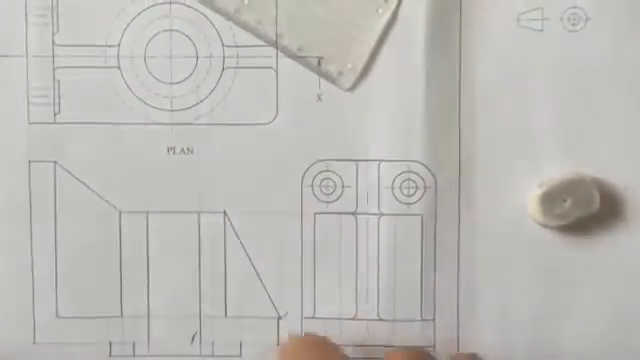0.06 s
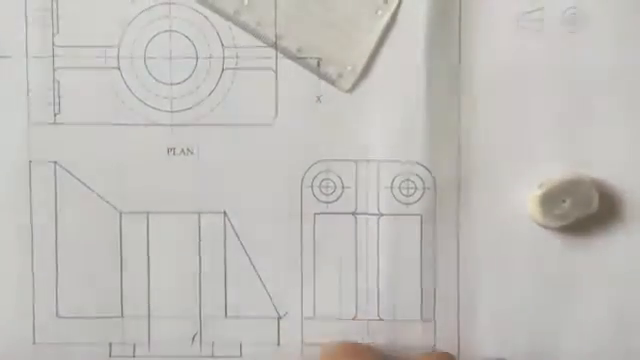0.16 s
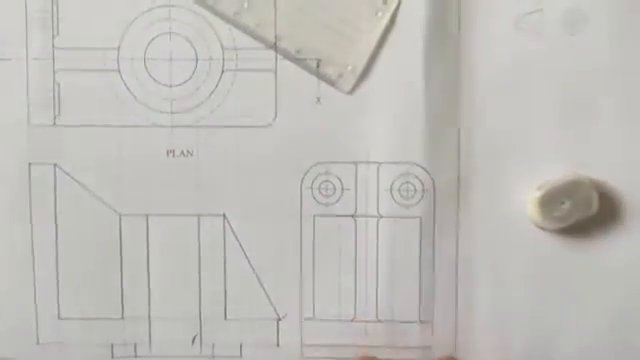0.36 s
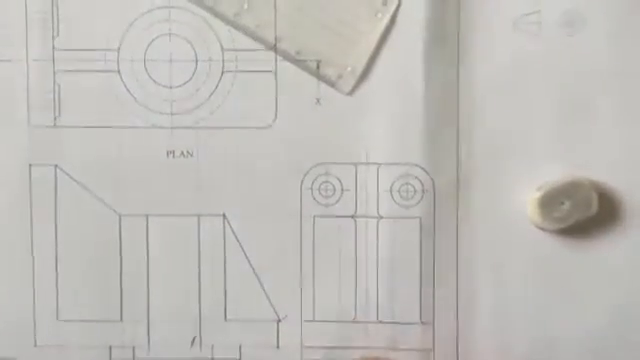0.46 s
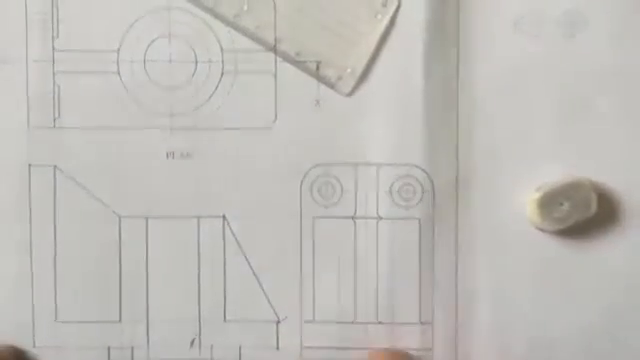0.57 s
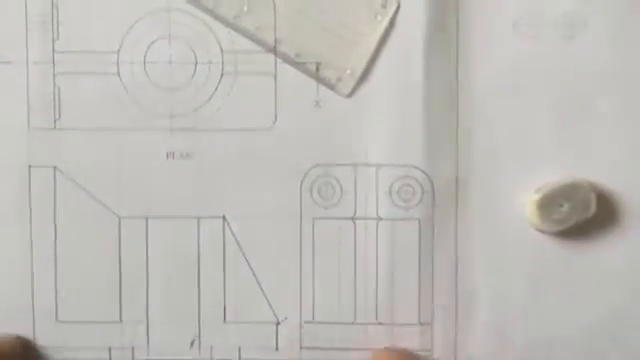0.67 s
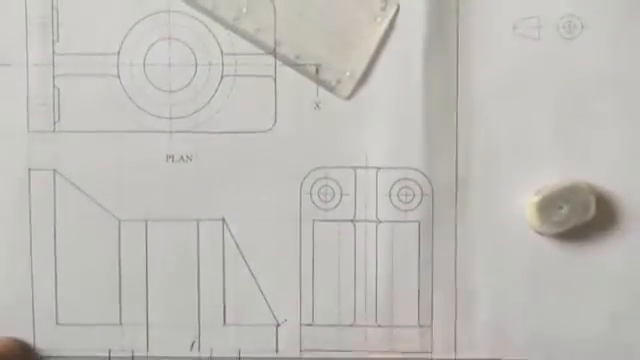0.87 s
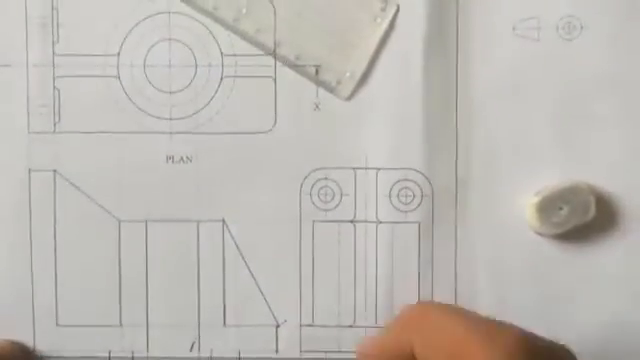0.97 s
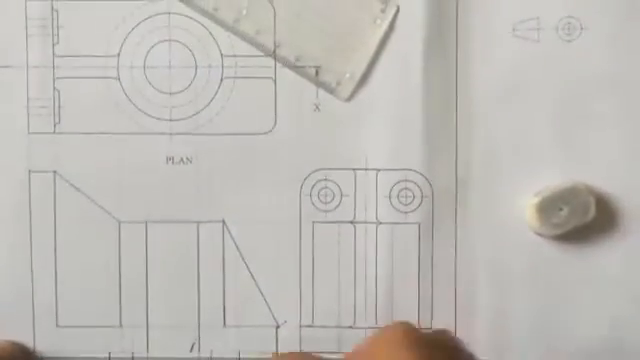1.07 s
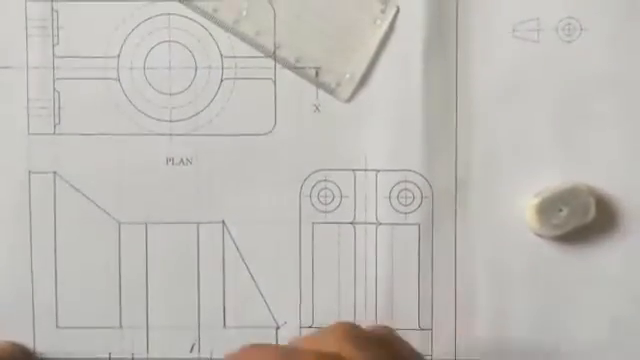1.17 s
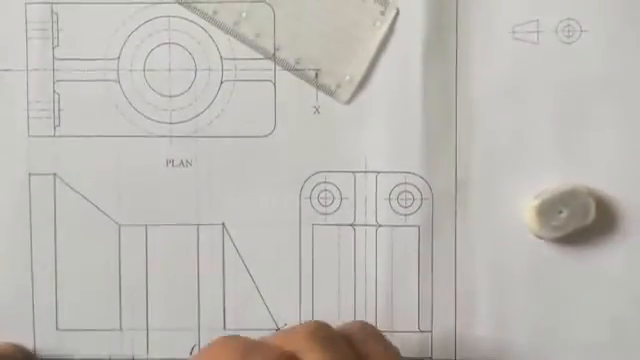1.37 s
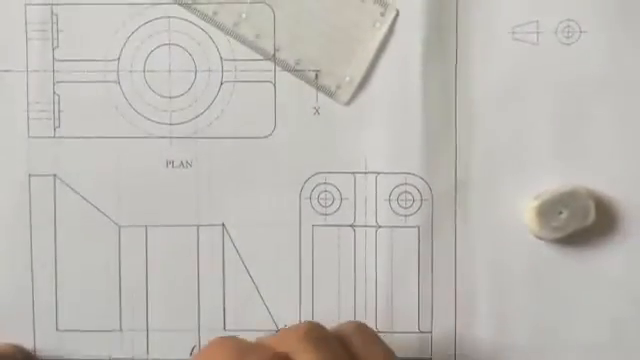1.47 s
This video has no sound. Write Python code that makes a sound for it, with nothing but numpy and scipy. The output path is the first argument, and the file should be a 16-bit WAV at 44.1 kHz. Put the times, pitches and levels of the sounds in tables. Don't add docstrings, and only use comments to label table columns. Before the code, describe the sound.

A plastic ruler is set down on paper on a wooden desk, heard close. Faint shuffling and light ticks lead to a loud clattering slap at 0.24 s, chattering until 0.35. More knocks, clicks and a short scratch come at 0.47-0.55, a hard double knock near 0.64, sharp snaps around 0.72-0.8, and a softer tap at 0.96. A tiny tick at 1.18 and a barely audible touch near 1.4 follow in small-room quiet.

```python
import sys
import numpy as np
from scipy import signal
from scipy.fft import rfft, irfft
from scipy.io import wavfile

SR = 44100
rng = np.random.default_rng(int(sys.argv[2]) if len(sys.argv) > 2 else 0)


def gain_from_decibels(decibels):
    exponent = np.asarray(decibels, float) / 20
    return 10 ** exponent


def persist_wave(psi):
    counts = np.round(np.clip(psi, -1, 1) * 32767).astype(np.int16)
    wavfile.write(sys.argv[1], SR, np.atleast_2d(counts).T)


N = 66150

# freq_hz, density_db
ROOM_TONE = [(30, 4.5), (60, -11.5), (160, 3), (400, -11.5), (1000, -16), (4800, -21.5), (12000, -27),
             (16000, -30)]
# middle_s, half_length_s, level_db
WHISPERS = [
    (.01, 0.099, -53.5),
    (0.098, 0.025, -56.5),
    (0.141, 0.037, -56.5),
    (0.625, 0.016, -47),
    (0.692, 0.061, -49),
    (0.757, 0.0064, -54),
    (1.056, 0.041, -57.5),
    (1.274, 0.049, -63.5),
    (1.418, 0.014, -66.5),
]
# freq_hz, level_db
WHISPER_COLOUR = [(1000, 7.5), (4000, 1), (9000, -3), (15000, -10)]
# start_s, peak_db, centre_hz, chatter_ms
KNOCKS = [(.003, -39, 298, 7.4), (0.059, -28, 474, 6.1), (.080, -34, 241, 6.7), (.237, -8.5, 373, 6.95),
          (.249, -14, 500, 4.6), (.262, -20.5, 400, 9.1), (0.276, -20, 305, 6), (.287, -18.5, 258, 6.2),
          (.303, -11.5, 465, 5.4), (.315, -19, 320, 5.8), (0.322, -24.5, 320, 5.3), (.337, -24.5, 260, 3.2),
          (.365, -37, 200, 6), (0.419, -37, 300, 3), (0.471, -16, 524, 7.3), (.480, -17.5, 300, 3.9),
          (.492, -19, 500, 1.2), (0.512, -29, 920, 3.3), (0.558, -29, 374, 8.9), (.637, -13.5, 735, 14.4),
          (.647, -14, 600, 7.9), (0.666, -14, 500, 4.2), (0.68, -21, 320, 7.4), (0.69, -23, 310, 2.6),
          (.732, -23, 306, 2.5), (0.773, -21, 357, 8.7), (.808, -30, 237, 5.7), (.9645, -22.5, 650, 5.7),
          (0.995, -26.5, 480, 5.45), (1.409, -54, 250, 8.3)]
# freq_hz, level_db, t60_s
TOP_MODES = [(200, -0.5, 0.084), (240.5, -3, 0.1), (320, -1.5, 0.055), (367.8, -4, 0.063),
             (419.2, -6.5, 0.11), (500, 1, 0.047), (565.4, -4, 0.095), (790, -22, 0.072),
             (842.3, -0.5, 0.068), (1032, -0.5, 0.013), (1171, 0, 0.044), (1260, 1, .05), (1547, -4, 0.032),
             (1823, 5, 0.033)]
# start_s, peak_db
THUMPS = [(.004, -36.5), (.065, -27.5), (0.109, -38), (0.241, -21.5), (0.291, -23.5), (0.323, -14.5),
          (0.36, -24.5), (0.462, -24.5), (0.507, -15.5), (0.546, -23), (0.596, -42), (.645, -56),
          (0.684, -21), (0.735, -21.5), (0.771, -36), (.84, -46), (0.898, -41), (0.975, -25.5), (1, -30),
          (1.403, -50), (1.471, -54.5)]
# freq_hz, level_db, t60_s
FRAME_MODES = [(52, -23.5, 0.077), (71.1, -2, 0.28), (88.6, 3, 0.087), (96.6, 0, 0.21), (135, -35, 0.32),
               (161.9, 4.5, 0.19)]
# freq_hz, t60_s
ROOM_T60 = [(60, 0.336), (200, 0.34), (1500, 0.62), (5000, 0.58), (12000, 0.66)]
# start_s, peak_db, ring_hz, crack_above_5khz_db
TICKS = [(0.058, -32, 940, -68), (.084, -44, 1600, -50), (.095, -34.5, 1955, -45.5),
         (0.165, -41, 1410, -63), (0.2045, -37, 2040, -50), (0.2395, -10.5, 3534, -35),
         (0.246, -16.5, 3230, -26), (0.274, -12.5, 3180, -28), (0.3, -22, 3250, -42),
         (0.308, -18.5, 3200, -50), (0.3255, -25.5, 3030, -38.5), (.351, -27, 2530, -38.5),
         (0.4358, -26, 3040, -71), (.460, -47, 4700, -44), (0.4742, -34.5, 2520, -54),
         (.4875, -22, 3320, -38), (0.498, -22.5, 3000, -30.5), (.518, -13, 1400, -44),
         (.547, -27, 2340, -37), (0.6354, -18, 1480, -19), (.648, -19, 1260, -37), (0.7205, -17, 1870, -44),
         (.762, -27.5, 2460, -29.5), (.769, -22.5, 1270, -45), (.788, -12, 3267, -20.5),
         (.794, -16.5, 1124, -55), (0.826, -29, 2550, -31), (0.9637, -19, 3503, -37.5),
         (0.996, -29.5, 3340, -58), (1.182, -46, 2200, -58)]
# start_s, peak_db, ring_hz, crack_above_5khz_db
MORE_TICKS = [(.065, -30.5, 1300, -71), (.243, -16, 3310, -47), (.250, -33, 2560, -36),
              (.257, -32.5, 3100, -50), (.264, -29, 2560, -53), (.2805, -28, 2580, -44),
              (.288, -31, 3000, -50), (.305, -30, 1310, -42), (.316, -36, 2470, -52),
              (.4925, -18.5, 1780, -48), (.4955, -30, 2480, -32), (.5025, -21, 3400, -30),
              (.506, -26, 1660, -28), (.5095, -17, 1580, -42), (.5135, -28, 1580, -51),
              (.522, -22, 3150, -52), (.5255, -30.5, 2940, -55), (.553, -32, 2840, -53),
              (.636, -23.5, 4390, -31), (.6385, -26.5, 986, -44), (.644, -24, 1710, -48),
              (.724, -19, 1830, -56), (.9668, -25.5, 3300, -48), (.7915, -24.5, 3340, -34),
              (.765, -28, 4480, -34), (.2765, -16, 3510, -39), (.999, -32, 2450, -62)]
# start_s, peak_db, pitch_hz, swell_ms, pitch_rise_per_swell
FLEXES = [(.059, -29.5, 321, 4.5, 0.013), (.2835, -15, 291.6, 5.2, .01), (.311, -15.5, 330, 5.6, 0.012),
          (.322, -15.5, 303, 2.4, -0.016), (.4735, -20, 287, 5, 0.0066), (.666, -14, 268, 4.44, 0.031),
          (0.679, -28, 320, 5, -0.0095), (.692, -21.5, 306, 2.5, 0.15), (.966, -24.5, 225.3, 9.5, 0.32),
          (.733, -31, 300, 3.7, .01), (.813, -26, 268, 4.6, -0.016)]
# start_s, length_s, level_db, tilt_db_per_oct
DRAGS = [
    (0.487, 0.045, -30, 2),
    (0.61, 0.014, -45, 6),
    (0.73, 0.089, -40.5, -5),
    (0.455, 0.061, -39.5, -2.8),
    (0.273, 0.12, -44.5, -4),
    (1.395, 0.036, -66, 0),
    (0.2244, 0.02, -44, -4.5),
    (0.143, 0.091, -57, -5.5),
]
# start_s, level_db, fade_s, tilt_db_per_oct
RATTLES = [(0.2372, -21, 0.017, -0.1), (0.273, -22.5, 0.0099, -2), (0.303, -28.5, 0.019, -1.4),
           (0.632, -24, 0.036, -1), (0.759, -23.5, 0.0076, 4), (0.788, -23, 0.017, 0.9),
           (0.824, -35, 0.011, 2.5), (0.963, -29.5, 0.011, -0.5), (0.995, -50.5, 0.013, 5.5),
           (0.473, -31.5, .012, -1), (0.521, -30.5, 0.013, 0), (0.546, -33, 0.018, 0.5)]
# freq_hz, level_db
SCRATCH_COLOUR = [(400, -7.5), (800, -2), (1400, -1.5), (2300, -5.5), (3500, -10), (5000, -16.5),
                  (8000, -21.5), (15000, -44)]
# start_s, peak_db, centre_hz
SNAPS = [(.2398, -18, 4260), (.275, -22, 4400), (.3012, -31, 4500), (.326, -29.5, 5000), (.3515, -35, 5000),
         (.4605, -33, 5800), (.4755, -33, 4000), (.488, -28.5, 4800), (.4965, -24.5, 8000),
         (.5045, -32.5, 7000), (.5085, -43, 7000), (.5478, -27, 3470), (.7625, -24, 6000),
         (.7885, -14.5, 6000), (.9643, -29, 4080), (1.1831, -36.5, 5070)]

ROOM_TONE_DB, ROOM_DB, TICK_ROOM_DB = -61, -7.5, -13
DESK_ECHO_S, DESK_ECHO_DB = 0.0031, -14.5
PLACE_DB, DETUNE = 2.5, 0.026
KNOCK_DB_PER_OCT, THUMP_MS, THUMP_DB = 9.5, 6.22, -3.0
TICK_T60_S, TICK_SPREAD, TICK_CHATTER_MS = 0.012, 0.113, 2.54
TICK_TOP = 2.1
CRACK_S, CRACK_DB, CRACK_LOW_HZ, CRACK_TOP_HZ = 0.00096, 3, 5000, 8870
FLEX_OVERTONE_DB = -10
SLIPS_PER_S, RATTLE_ATTACK_S = 9800, 0.0044
SNAP_S, SNAP_OCTAVES = 0.00029, 0.82
MIC_LOW_HZ, RECORDER_TOP_HZ = 53, 14700


def add(out, start_s, x):
    i = max(int(start_s * SR), 0)
    out[i:i + len(x)] += x[:len(out) - i]


def add_with_echo(out, start_s, x):
    add(out, start_s, x)
    add(out, start_s + DESK_ECHO_S, gain_from_decibels(DESK_ECHO_DB) * x)


def colour(x, points):
    hz, db = np.array(points, float).T
    f = np.maximum(np.arange(len(x) // 2 + 1) * SR / len(x), 1)
    gain = gain_from_decibels(np.interp(np.log(f), np.log(hz), db))
    y = irfft(rfft(x) * gain, len(x))
    return y / np.std(y)


def chatter(ms, noise):
    t = np.arange(len(noise)) / SR * 1000 / max(ms, 0.2)
    force = rfft(noise * t * np.exp(-3 * t))
    size = np.abs(force)
    even = irfft(force / (size + 0.38 * size.mean()))
    return even * np.minimum(4 * t, 1) * np.exp(-t)


def ring(modes, push, chance, length_s=0.3):
    t = np.arange(int(length_s * SR))[:, None] / SR
    hz, db, t60_s = np.array(modes, float).T
    gain = gain_from_decibels(db + PLACE_DB * chance[:len(hz)]) * np.sign(chance[-len(hz):])
    hz = hz * (1 + DETUNE * chance[-len(hz):])
    decay = np.exp(-np.log(1000) * t / t60_s)
    impulse = (gain * decay * np.sin(2 * np.pi * hz * t)).sum(1)
    y = signal.fftconvolve(impulse, push)
    return y / np.abs(y).max()


def room_tone():
    return gain_from_decibels(ROOM_TONE_DB) * colour(rng.standard_normal(N), ROOM_TONE)


def whispers():
    t = np.arange(N) / SR
    swell = np.zeros(N)
    for middle_s, half_s, db in WHISPERS:
        swell += gain_from_decibels(db) * np.cos(np.pi / 2 * np.clip((t - middle_s) / half_s, -1, 1))
    grain = rng.standard_normal(N) * gain_from_decibels(1.66 * rng.exponential(1, N))
    return swell * colour(grain, WHISPER_COLOUR)


def knocks():
    out = np.zeros(N)
    for start_s, db, centre_hz, ms in KNOCKS:
        near = [(hz, level_db - KNOCK_DB_PER_OCT * abs(np.log2(hz / centre_hz)), t60_s)
                for hz, level_db, t60_s in TOP_MODES]
        noise = rng.standard_normal(2048)
        add(out, start_s, gain_from_decibels(db) * ring(near, chatter(ms, noise), noise[:30]))
    return out


def thumps():
    out = np.zeros(N)
    push = np.hanning(int(THUMP_MS * SR / 1000))
    for start_s, db in THUMPS:
        add(out, start_s, gain_from_decibels(db + THUMP_DB) * ring(FRAME_MODES, push, rng.standard_normal(30)))
    return out


def room(x):
    t = np.arange(SR // 2) / SR
    noise = rfft(rng.standard_normal(len(t)))
    f = np.log(np.arange(len(noise)) * 2.0 + 1)
    hz = np.log(np.array(ROOM_T60)[:, 0])
    tail = np.zeros(len(t))
    for k, (_, t60_s) in enumerate(ROOM_T60):
        band = np.interp(f, hz, np.arange(len(hz)) == k)
        tail += irfft(noise * band) * np.exp(-np.log(1000) * t / t60_s)
    tail *= np.clip(t / 0.012, 0, 1)
    return signal.fftconvolve(x, tail / np.sqrt(np.sum(tail ** 2)))[:N]


def ticks(table):
    out, t = np.zeros(N), np.arange(1024) / SR
    crack_band = signal.butter(2, [CRACK_LOW_HZ, CRACK_TOP_HZ], "band", fs=SR, output="sos")
    crack_swell = t / CRACK_S * np.exp(1 - t / CRACK_S)
    chances = rng.standard_normal((len(table), 30))
    noises = rng.standard_normal((len(table), 2, 1024))
    for (start_s, db, note_hz, crack_db), chance, noise in zip(table, chances, noises):
        t60_s = TICK_T60_S * (2000 / note_hz) ** 0.52
        cluster = [(note_hz * np.exp(TICK_SPREAD * k), -3.5 * abs(k), t60_s * (1.7 if k == 0 else 1))
                   for k in range(-5, 6)]
        note = ring(cluster, chatter(TICK_CHATTER_MS, noise[0]), chance, 0.05)
        lowpass = signal.butter(3, TICK_TOP * note_hz, fs=SR, output="sos")
        tick = gain_from_decibels(db) * signal.sosfilt(lowpass, note)
        crack = signal.sosfilt(crack_band, noise[1] * crack_swell)
        tick[:1024] += gain_from_decibels(crack_db + CRACK_DB) * crack
        add_with_echo(out, start_s, tick)
    return out


def flexes():
    out, t = np.zeros(N), np.arange(4096) / SR
    for start_s, db, hz, swell_ms, rise in FLEXES:
        u = t * 1000 / swell_ms
        phase = 2 * np.pi * hz * t * (1 + rise * np.minimum(u, 6) / 2)
        swell = u ** 2 * np.exp(2 - 2 * u)
        tone = np.sin(phase) - gain_from_decibels(FLEX_OVERTONE_DB) * np.cos(2 * phase)
        add(out, start_s, gain_from_decibels(db) * swell * tone)
    return out


def scratch(slips, tilt_db):
    return colour(slips, [(hz, db + tilt_db * np.log2(hz / 2000)) for hz, db in SCRATCH_COLOUR])


def drags_and_rattles():
    t = np.arange(N) / SR
    size = gain_from_decibels(0.43 * rng.exponential(1, N)) * rng.standard_normal(N)
    slips = size * (rng.random(N) < SLIPS_PER_S / SR)
    out = np.zeros(N)
    for start_s, length_s, db, tilt_db in DRAGS:
        swell = np.sin(np.pi * np.clip((t - start_s) / length_s, 0, 1)) ** 1.43
        out += gain_from_decibels(db) * swell * scratch(slips, tilt_db)
    for start_s, db, fade_s, tilt_db in RATTLES:
        attack = np.clip((t - start_s) / RATTLE_ATTACK_S, 0, 1)
        fade = np.exp(-np.abs(t - start_s) / fade_s)
        out += gain_from_decibels(db) * attack * fade * scratch(slips, tilt_db)
    return out


def snaps():
    out, t = np.zeros(N), np.arange(512) / SR
    for start_s, db, centre_hz in SNAPS:
        edges_hz = centre_hz * 2 ** np.array([-SNAP_OCTAVES, SNAP_OCTAVES])
        edges_hz = np.minimum(edges_hz, 0.45 * SR)
        band = signal.butter(2, edges_hz, "band", fs=SR, output="sos")
        burst = np.sign(rng.standard_normal(512)) * np.exp(-t / SNAP_S)
        snap = signal.sosfilt(band, burst)
        add_with_echo(out, start_s, gain_from_decibels(db) * snap / np.abs(snap).max())
    return out


def scene():
    edge = ticks(TICKS)
    body = knocks() + thumps() + drags_and_rattles() + flexes()
    air = room_tone()
    reverb = gain_from_decibels(ROOM_DB) * room(body + gain_from_decibels(TICK_ROOM_DB) * edge)
    roomless = whispers() + ticks(MORE_TICKS) + snaps()
    return (edge + body + reverb + air + roomless)[None]


def roll_off(x):
    return signal.sosfilt(signal.butter(12, 16320, fs=SR, output="sos"), x)


def record(dry):
    top_cut = signal.ellip(5, 1, 30, RECORDER_TOP_HZ, fs=SR, output="sos")
    bass_cut = signal.butter(2, MIC_LOW_HZ, "high", fs=SR, output="sos")
    mix = signal.sosfilt(bass_cut, signal.sosfilt(top_cut, dry))
    return roll_off(mix)


dry = scene()
out = record(dry)
persist_wave(out)
```